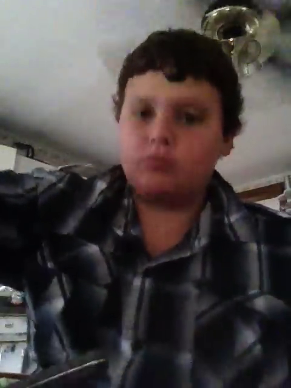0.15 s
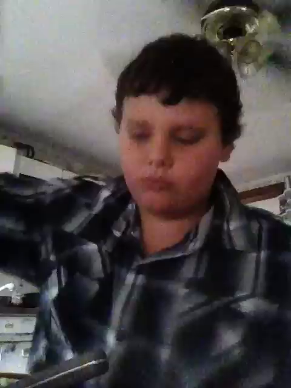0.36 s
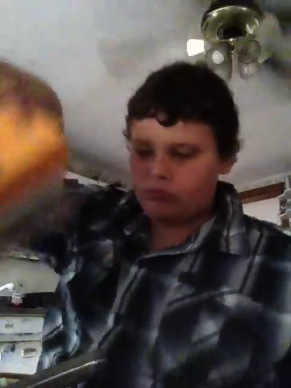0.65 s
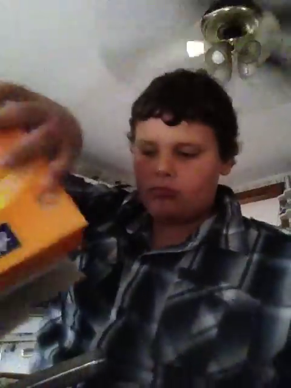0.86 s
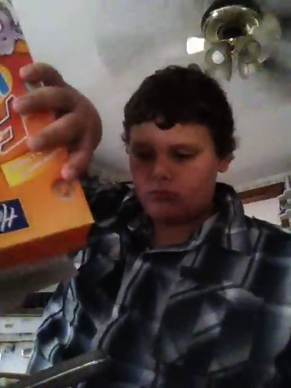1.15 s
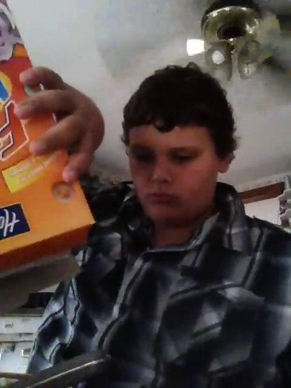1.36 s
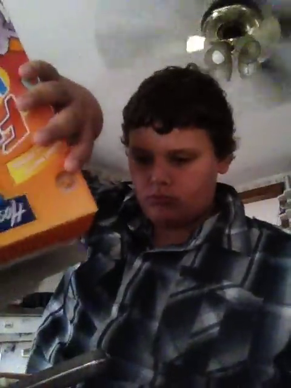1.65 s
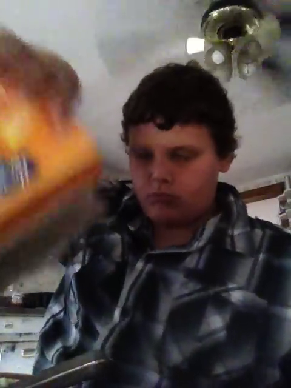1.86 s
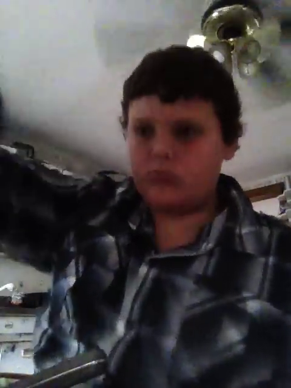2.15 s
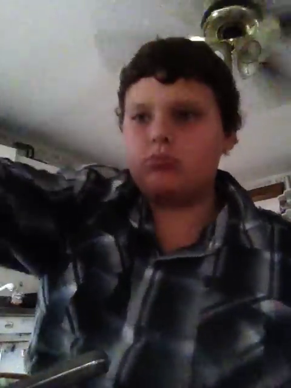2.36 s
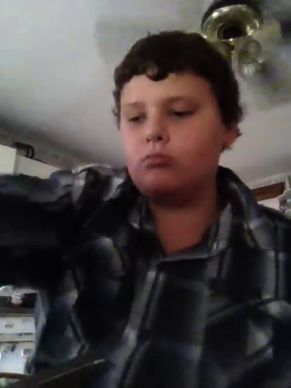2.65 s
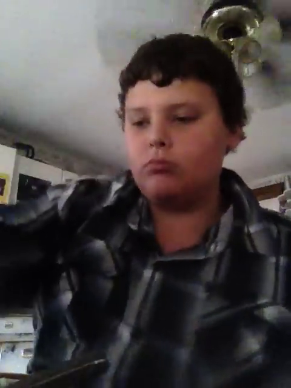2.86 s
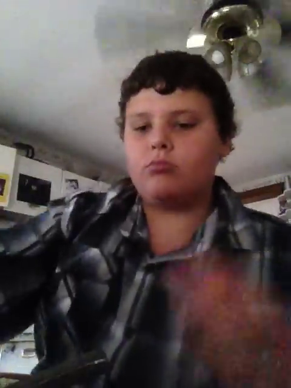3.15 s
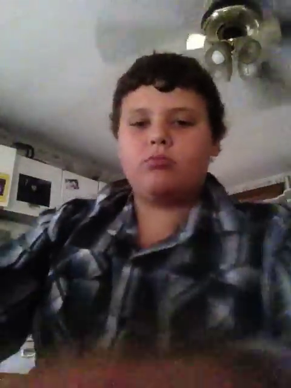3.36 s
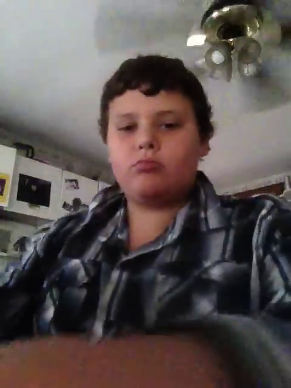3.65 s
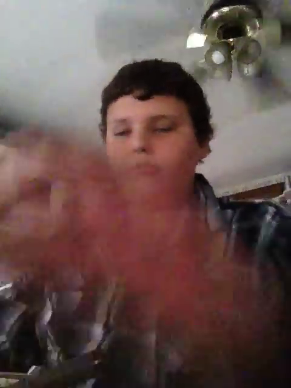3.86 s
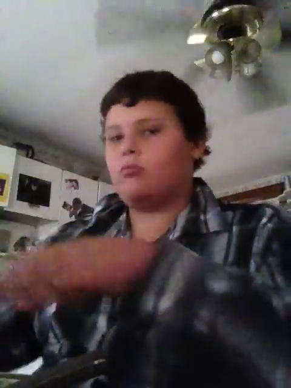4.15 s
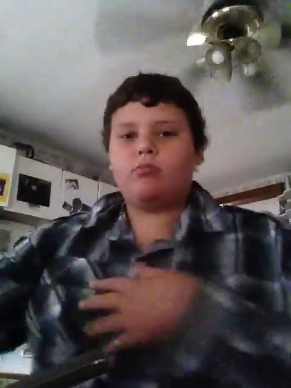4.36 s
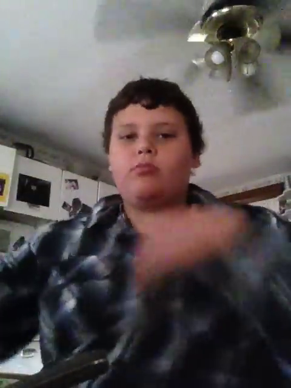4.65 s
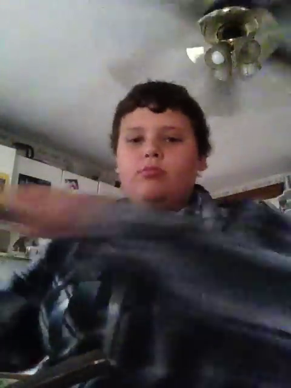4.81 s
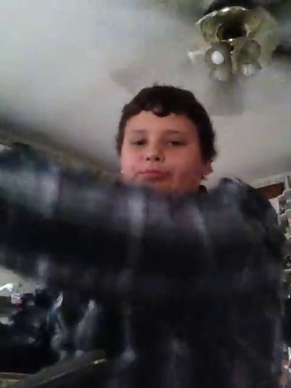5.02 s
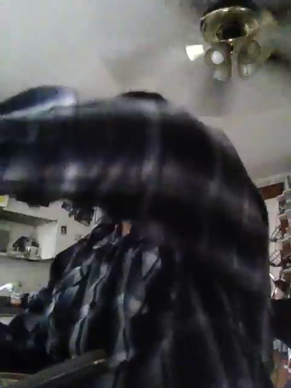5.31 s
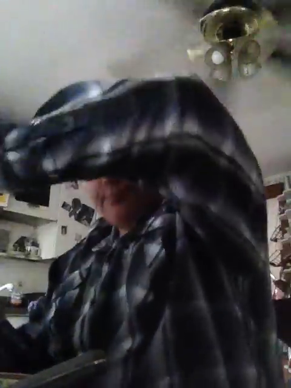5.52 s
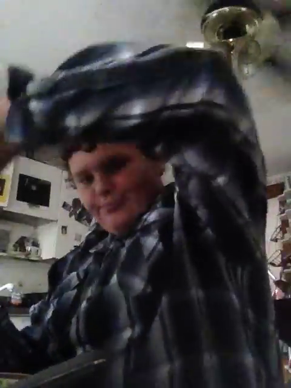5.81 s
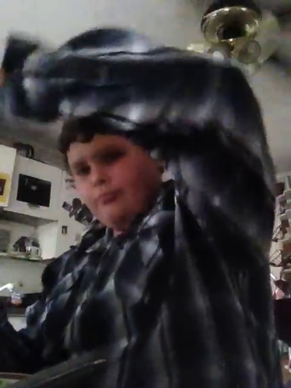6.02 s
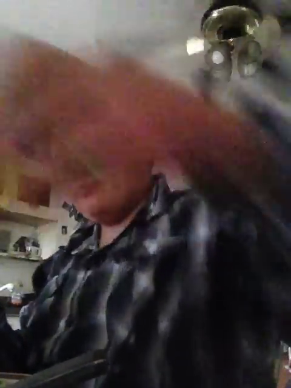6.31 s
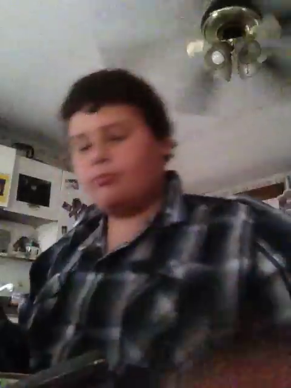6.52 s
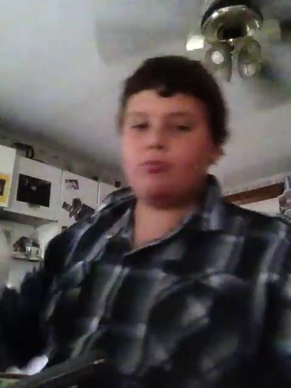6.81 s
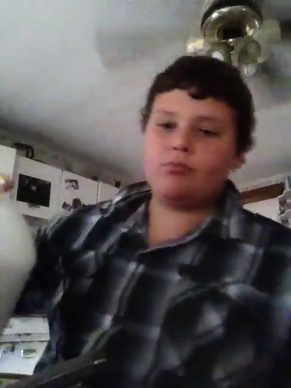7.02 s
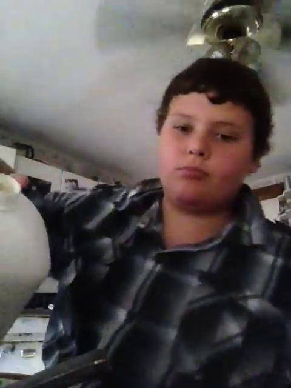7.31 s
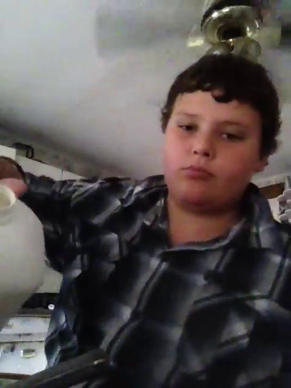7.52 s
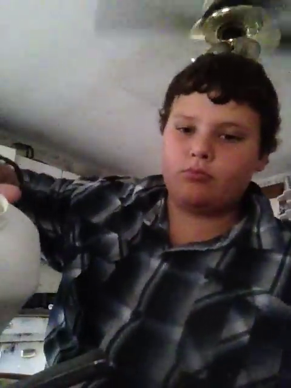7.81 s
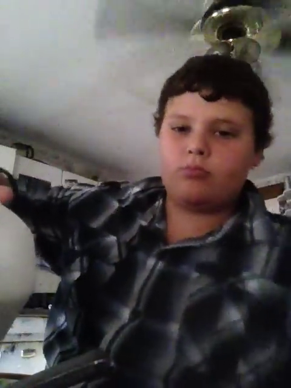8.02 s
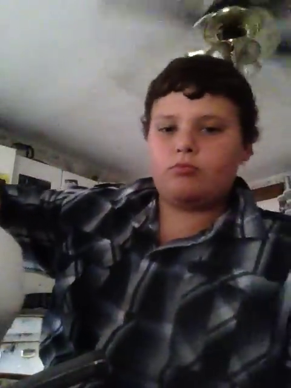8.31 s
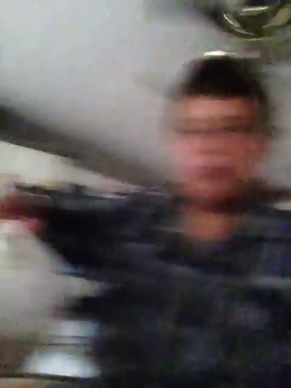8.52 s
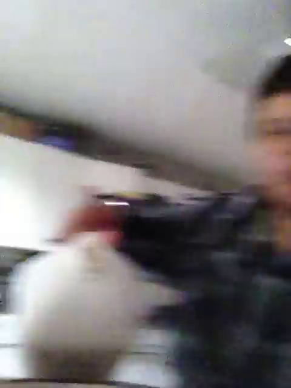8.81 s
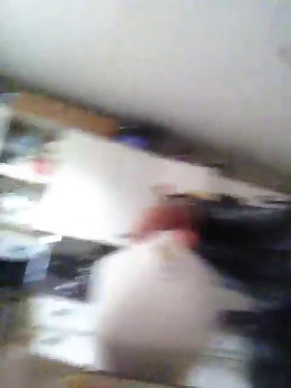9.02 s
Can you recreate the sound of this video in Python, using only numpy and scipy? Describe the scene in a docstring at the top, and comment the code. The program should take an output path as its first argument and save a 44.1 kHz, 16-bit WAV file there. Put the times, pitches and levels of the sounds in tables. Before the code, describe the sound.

A steady airy wash of ceiling fan and fridge, with faint low motor hum and slight hiss, runs throughout. From 0 to 0.6 s a carton rustles with dry ticks and a short sinking flap drag. At 0.7-1.2 s it grows into a dense, loud burst of hollow cardboard pops and knocks with gritty cereal rustle, trailing off with faint ceramic rings to 1.5 s. A lull follows until 2.3 s, then a hard bright clatter with dull table thuds peaks around 2.55 s. Rustling and small taps thin out to 3.7 s, ending with delicate bowl clinks. A small clink comes at 4.1 s, then knocks and soft sliding from 4.3 to 6.1 s. Sharp knocks and a scuff at 6.6-6.8 s fade away. At 8.24 s a plastic jug snaps sharply with a brief hollow ring; soft low bumps follow at 8.5 and 9 s.

```python
"""Cereal at a kitchen table

A carton rustles, knocks and pops as cereal is tipped into a ceramic bowl; a spoon clinks, things slide over
the table top and a plastic jug snaps open. A ceiling fan and a fridge fill the room.
Rubbing is random slips through resonances, knocks are noise bursts, the bowl is paired decaying sines,
the fan and fridge are filtered noise. A small microphone lies on the same table, close by."""
import sys
import numpy as np
from scipy import signal
from scipy.io import wavfile
from scipy.ndimage import uniform_filter1d

SR = 44100
rng = np.random.default_rng(int(sys.argv[2]) if len(sys.argv) > 2 else 0)


def waveform_to_disk(signal):
    """Save audio, clipped to [-1, 1], as 16-bit WAV at the path in sys.argv[1]."""
    frames = np.transpose(np.atleast_2d(signal))
    scaled = np.clip(frames, -1, 1) * 32767
    samples = np.round(scaled).astype(np.int16)
    wavfile.write(sys.argv[1], SR, samples)


N = 404387
TIME = np.arange(N) / SR

# air and panels of the carton: (centre [Hz], width of one pass [Hz], level [dB])
CARTON_MODES = [(563, 227, 4.5), (678, 94, 6.5), (771, 162, 6.5), (933, 263, 5.5), (1282, 205, -1.5),
                (2186, 420, -15.5)]
# table top: (centre [Hz], width of one pass [Hz], level [dB])
TABLE_MODES = [(146, 39, -3.5), (227.6, 75, 1.5), (371, 217, -1), (448, 164, 4)]
# spectrum of a scraped or struck surface: (frequency [Hz], density [dB per Hz])
SCRAPE_SPECTRUM = [(500, -24), (1000, -15), (1500, -9), (2500, -14.5), (4000, -14.5), (5000, -14.5),
                   (6500, -43)]
# spectrum of a bright crack: (frequency [Hz], density [dB per Hz])
CRACK_SPECTRUM = [(3000, -45), (4500, 3), (5500, 2.5), (7500, 8.5), (9500, -1), (12000, -19.5),
                  (16000, -12)]


def gain_of(db):
    """Amplitude factor of a level in dB."""
    return 10 ** (np.asarray(db) / 20)


def evened(x):
    """Scales to an rms of 1."""
    return x / np.sqrt(np.mean(x ** 2) + 1e-20)


def read(points, hz):
    """Reads a curve of (Hz, value), interpolated over log frequency."""
    f, value = np.transpose(points)
    return np.interp(np.log(hz + 1), np.log(f + 1), value)


def add(mix, start_s, sound):
    """Adds a sound to the mix in place, cut at the end."""
    part = mix[round(start_s * SR):][:len(sound)]
    part += sound[:len(part)]


def colour(x, points):
    """Causal filter with the given spectrum: the phase follows from the log gain."""
    log_gain = np.log(gain_of(read(points, abs(np.fft.fftfreq(4096, 1 / SR)))))
    minimum_phase = np.exp(np.conj(signal.hilbert(log_gain)))
    taps = np.fft.ifft(minimum_phase).real[:2048]
    return signal.oaconvolve(x, taps)[:len(x)]


def resonate(x, hz, width_hz):
    """Shifts the curve hz down to zero, smooths, and shifts back: a resonance of gain 1."""
    turn = np.exp(2j * np.pi * np.cumsum(hz * np.ones(len(x))) / SR)
    pole = np.exp(-np.pi * width_hz / SR)
    return 2 * (turn * signal.lfilter([1 - pole], [1, -pole], x / turn)).real


def body(x, modes):
    """Sum of broad resonances of alternating sign, each applied twice for steep skirts."""
    total = 0
    for k, (hz, width_hz, db) in enumerate(modes):
        mode = resonate(resonate(x, hz, width_hz), hz, width_hz)
        total = total + (-1) ** k * gain_of(db) * mode
    return total


def grit(per_s, spread_db):
    """Sparse slips of random sign; a few are much larger."""
    size_draw, sign_draw, slip_draw = rng.random((3, N))
    size = gain_of(-spread_db * np.log(np.maximum(size_draw, .01)))
    return evened(size * np.sign(sign_draw - .5) * (slip_draw < per_s / SR))


def air():
    """Fan and fridge: coloured noise that drifts slowly, with motor tones of narrow-band noise."""
    # rush of air: (frequency [Hz], density [dB per Hz])
    rush_spectrum = [(18, -65), (30, -47), (90, -19), (145, 0), (221, -6.5), (252, -0.5), (384, -1),
                     (426, -2.5), (461, -4), (649, -5), (988, -6), (2300, -9), (4780, -22), (5450, -21),
                     (14400, -32.5), (16000, -44)]
    # drift of the rush: (time [s], level [dB])
    rush_swell = [(0, 1), (2, -1), (4, 0), (6.4, -0.5), (7.6, 1.6), (8.3, 1.6), (9.17, 0.6)]
    # wavering motor tones: (centre [Hz], width [Hz], level [dB rms])
    motor_tones = [(133, 52, -76), (219.5, 4.5, -67), (475, 4.5, -68.5)]
    rush_db = -61
    swell = gain_of(np.interp(TIME, *np.transpose(rush_swell)))
    mix = gain_of(rush_db) * evened(colour(rng.standard_normal(N), rush_spectrum)) * swell
    for hz, width_hz, db in motor_tones:
        mix = mix + gain_of(db) * evened(resonate(rng.standard_normal(N), hz, width_hz))
    return mix


def rubbing(swells, gritty, clumpy_db):
    """One stream of slips drives the scraped surface, the table top, a hollow body and a fine fizz."""
    # (smooth slips [per s], sharp snaps [per s])
    smooth_per_s, snaps_per_s = 2600, 310
    # fine fizz: (frequency [Hz], density [dB per Hz])
    fizz_spectrum = [(3500, -29), (5200, -1), (7500, 5.5), (10000, -2.5), (13000, -5), (16000, -9)]
    fade_db = -20  # over one rise or fall time
    s, rise, hold, fall, db, thrum_db, hollow_db, fizz_db, swell_hz = np.transpose(swells)[:, :, None]

    t = TIME[::64]
    before = np.maximum(s - t, 0) / np.maximum(rise, .003)
    after = np.maximum(t - s - hold, 0) / np.maximum(fall, .003)
    power = gain_of(np.maximum(db + fade_db * (before + after), -120)) ** 2
    hz = np.interp(TIME, t, (power * swell_hz).sum(0) / power.sum(0))
    levels = [np.interp(TIME, t, np.sqrt((power * gain_of(d) ** 2).sum(0)))
              for d in (0, thrum_db, hollow_db, fizz_db)]

    # slips come in bunches, partly shared by the four parts
    bunches = evened(uniform_filter1d(uniform_filter1d(rng.standard_normal((5, N)), size=400), size=200))
    clumps = gain_of(clumpy_db * (0.36 * bunches[0] + 0.68 * bunches[1:]))
    force, thrum, hollow, fizz = clumps * levels

    slips = rng.standard_normal(N) + gritty * (grit(smooth_per_s, 3.0) + .8 * grit(snaps_per_s, 3.2))
    scrape = colour(slips, SCRAPE_SPECTRUM)
    scrape = evened(0.036 * evened(scrape) + evened(resonate(scrape, hz, 1940)))
    return (force * scrape
            + thrum * evened(body(slips, TABLE_MODES))
            + hollow * evened(body(slips, CARTON_MODES))
            + fizz * evened(colour(slips, fizz_spectrum)))


def bump(db, hz, t60_s):
    """A soft push, about a cycle long, swings a panel that then dies away."""
    rise_cycles = 0.58  # time constant
    t = np.arange(SR // 4) / SR
    onset = (1 - np.exp(-t * hz / rise_cycles)) ** 2
    swing = np.sin(2 * np.pi * hz * t) * gain_of(-60 * t / max(t60_s, .01)) * onset
    return gain_of(db) * swing / abs(swing).max()


def knock(db, hollow_db, crack_db, rattle_ms):
    """A blow and its short rattle: the struck spot, the table under it, a hollow body and a bright crack."""
    thud_db = -24.5  # table, re struck spot
    middle_spot_hz, hollow_db_per_octave = 1820, 44  # hollower knocks sound lower
    hollow_lead_s = 0.00195  # drops the slow start of the doubled resonances: the hollow answers at once
    t = np.arange(SR // 5) / SR
    spot_hz = middle_spot_hz * 2 ** (-hollow_db / hollow_db_per_octave)

    blow = gain_of(-60 * (1000 * t / max(rattle_ms, 3)) ** 1.7) + 2.3 * gain_of(-14000 * t)
    contact = rng.standard_normal(len(t)) * blow * np.minimum(t / 0.00033, 1)
    contact[6] += 5.0  # the first touch is one clean tick

    spot = evened(resonate(contact, spot_hz, 0.53 * spot_hz)) + 1.14 * evened(contact)
    spot = colour(spot, SCRAPE_SPECTRUM)
    thud = body(contact, TABLE_MODES)
    crack = colour(contact * gain_of(-900 * t), CRACK_SPECTRUM)  # crack dies first
    hollow = np.roll(body(contact, CARTON_MODES), -round(hollow_lead_s * SR))
    hollow = signal.lfilter(*signal.butter(2, 250, "high", fs=SR), hollow)  # too small for bass
    parts = [(0, spot), (thud_db, thud), (hollow_db, hollow), (crack_db, crack)]
    return sum(gain_of(db + part_db) * x / abs(x).max() for part_db, x in parts)


def flap():
    """A carton flap drags: gritty slips through one resonance that mostly sinks."""
    # (time [s], resonance [Hz], level [dB])
    drag_path = [(.41, 1880, -53), (.432, 1750, -48), (.47, 1750, -51), (.5, 1470, -50.5), (.54, 1250, -57),
                 (.6, 1310, -58), (.63, 1200, -68)]
    s, hz, db = np.transpose(drag_path)
    slips = rng.standard_normal(N) + 1.2 * grit(1800, 2.5)
    drag = evened(resonate(slips, np.interp(TIME, s, hz), 280))
    return gain_of(np.interp(TIME, s, db, left=-120, right=-120)) * drag


def pop(db, hz, length_s):
    """A carton panel flips, holds its note with a slight waver and is damped by the hand."""
    t = np.arange(SR // 8) / SR
    waver = 1 + 0.031 * evened(uniform_filter1d(rng.standard_normal(len(t)), size=300))
    note = np.sin(2 * np.pi * np.cumsum(hz * waver) / SR)
    damping = gain_of(-41 * (t / max(length_s, .005)) ** 3)
    return gain_of(db) * damping * np.minimum(t * hz, 1) * note


def clink(db, others_db, place, damping):
    """The bowl rings as decaying modes; the place on the rim shares each blow between twin modes."""
    # modes split in two by the uneven rim, the first leads:
    # (mode [Hz], twin [Hz], level [dB], t60 before damping [s])
    bowl_modes = [(3785, 3590, 0, .22), (2025, 2200, 3, .11), (5430, 5520, -7, .3), (5770, 6820, -11, .14),
                  (7960, 7990, -8, .26), (8900, 8780, -14, .13), (10430, 10380, -10, .11),
                  (11750, 11330, -15, .11), (13340, 12670, -13, .11)]
    hz, twin_hz, mode_db, t60_s = np.transpose(bowl_modes)
    t = np.arange(SR // 3)[:, None] / SR
    phase, twin_phase = rng.random((2, len(bowl_modes)))  # cycles

    turn = np.pi / 2 * place
    pair = np.cos(turn) * np.sin(2 * np.pi * (hz * t + phase))
    pair = pair + np.sin(turn) * np.sin(2 * np.pi * (twin_hz * t + twin_phase))

    # each mode wavers at random, which roughens the ring
    wander = uniform_filter1d(rng.standard_normal(pair.shape), size=260, axis=0)
    waver = .9 + .4 * evened(uniform_filter1d(wander, size=130, axis=0))

    weight_db = mode_db + others_db * (np.arange(len(bowl_modes)) > 0)
    ring = gain_of(db + weight_db - 60 * t / (damping * t60_s)) * pair * waver
    t = t[:, 0]
    return ring.sum(1) * np.minimum(t / 0.001, 1) * (1 + .5 * gain_of(-1500 * t))  # loudest under the blow


def cap(db):
    """A snap of a few milliseconds passes the damped plastic jug, which shudders and rings on faintly."""
    # body of the jug: (centre [Hz], width of one pass [Hz], level [dB])
    jug_modes = [(342, 120, -2.5), (547, 150, 4), (765, 160, 10.5), (1010, 150, 10), (1435, 160, 18),
                 (1520, 120, 13), (1770, 530, 9), (2280, 310, 4.5), (2490, 460, 6), (3100, 380, 4.5),
                 (3660, 530, -3), (6230, 680, -6)]
    # ringing modes: (frequency [Hz], level re burst peak [dB], t60 [s])
    jug_ring = [(1362, -20, .15), (1490, -25, .33), (3015, -24, .08)]
    t = np.arange(SR // 4) / SR
    snap, shudder = rng.standard_normal((2, len(t)))
    snap = snap * gain_of(-7000 * t)
    shudder = shudder * 0.19 * gain_of(-320 * t)
    snap[0] = 6
    burst = body(snap, jug_modes) + body(shudder, jug_modes[:-1]) + 0.034 * colour(snap, CRACK_SPECTRUM)
    ring = sum(gain_of(ring_db - 60 * t / t60_s) * np.sin(2 * np.pi * hz * t)
               for hz, ring_db, t60_s in jug_ring)
    return gain_of(db) * (burst / abs(burst).max() + ring)


def kitchen(x):
    """Room echoes: sparse taps of random sign, each band dying at its own speed."""
    # (frequency [Hz], t60 [s])
    decay = [(200, 0.38), (530, 0.084), (1400, 0.31), (3700, 0.2), (9700, 0.27)]
    taps = np.zeros(SR // 2)
    at = np.arange(200, len(taps) - 20, 20)
    taps[at + rng.integers(0, 20, len(at))] = rng.choice([-1., 1.], len(at))
    hz, t, bands = signal.stft(taps, SR, nperseg=256)
    bands = bands * gain_of(-60 * t / read(decay, hz)[:, None])
    tail = signal.istft(bands, SR, nperseg=256)[1]
    return signal.fftconvolve(x, tail / np.linalg.norm(tail))[:N]


def scene():
    """Sums the near sounds, their room echoes and the air of the room."""
    # overlapping swells of cereal and carton rustling; thrum, hollow and fizz re scrape:
    # (full force [s], rise [s], hold [s], fall [s], scrape [dB], table thrum [dB], hollow carton [dB],
    # fizz [dB], scrape centre [Hz])
    rustle_swells = [(0.06, 0.15, 0.0054, 0.23, -44, -1, -6.5, -6.5, 2470),
                     (0.19, 0.23, 0.02, 0.084, -45.5, -11, -21, -18, 1690),
                     (0.42, 0.042, 0.045, 0.11, -50.5, -21, -2, -13, 1700),
                     (0.53, 0.16, 0.06, 0.11, -57, 2, 8.5, -32, 1500),
                     (0.778, 0.097, 0.2, 0.064, -43.5, -1, 0, -14.5, 1260),
                     (1.062, 0.037, 0.0036, 0.32, -34, -2.5, -18, -23, 2000),
                     (1.29, 0.057, 0.0071, 0.087, -53, -18, -0.5, -12, 2160),
                     (1.344, 0.12, 0.097, 0.11, -48.5, -7, -8, -5.5, 2060),
                     (1.55, 0.18, 0.029, 0.23, -58, -29, -9, -12, 2050),
                     (1.85, 0.42, 0.014, 0.11, -61.5, -12, -18, -11, 2160),
                     (1.97, 0.047, 0.061, 0.11, -56.5, -14, -10, -9.5, 2460),
                     (2.311, 0.019, 0.015, 0.063, -38.5, 2.5, -6.5, -5, 2230),
                     (2.38, 0.076, 0.14, 0.11, -55.5, -3, -13, -5.5, 2160),
                     (2.532, 0.024, 0.032, 0.075, -27, -3.5, -15, -6, 2850),
                     (2.6, 0.051, 0.049, 0.26, -35, -6.5, -8.5, -5.5, 3200),
                     (2.9, 0.63, 0.35, 0.21, -52.5, -1.5, -7, -8, 2870),
                     (3.5, 0.16, 0.045, 0.12, -61, 2, -24, -16, 2300),
                     (3.6, 0.077, 0.12, 0.11, -56.5, -3, -6, -1, 2980)]
    # overlapping swells of sleeve and jug sliding over the table, several can make one slide;
    # thrum, hollow and fizz re scrape:
    # (full force [s], rise [s], hold [s], fall [s], scrape [dB], table thrum [dB], hollow body [dB],
    # fizz [dB], scrape centre [Hz])
    slide_swells = [(4.27, 0.013, 0.0073, 0.079, -46.5, -3.5, -1, -10, 1880),
                    (4.364, 0.099, 0.0053, 0.082, -44.5, -15, -7.5, -14.5, 3070),
                    (4.52, 0.024, 0.006, 0.27, -40.5, -4, -3.5, -10, 2440),
                    (4.702, 0.025, 0.012, 0.11, -45, -1.5, 1.5, -19, 1890),
                    (4.78, 0.35, 0.28, 0.5, -40, -38, -14.5, -6, 3200),
                    (5.1, 0.41, 0.11, 0.52, -53, -1, 4.5, -15, 1500),
                    (5.3, 0.93, 0.081, 0.044, -49, -22.5, -7, -5.5, 2330),
                    (5.56, 0.45, 0.12, 0.16, -54, -4, 0.5, -9, 2220),
                    (5.67, 0.11, 0.043, 0.13, -53, -30, -26, -8.5, 2920),
                    (5.888, 0.11, 0.0037, 0.13, -49.5, -1, 2, -13.5, 2100),
                    (6.072, 0.018, 0.017, 0.12, -45.5, -8, -4.5, -16.5, 1250),
                    (6.643, 0.031, 0.0044, 0.031, -38.5, -18, -25, -30, 1760),
                    (6.69, 0.13, .01, 0.67, -49.5, -6, -4, -13, 2020),
                    (6.762, 0.045, 0.011, 0.088, -45, -12, -15, -2.5, 2000),
                    (7.23, 0.21, .01, 0.36, -59, -11, -24, -3, 2320)]
    # dull bumps carried by the table: (time [s], peak [dB], frequency [Hz], t60 [s])
    bump_events = [(0.018, -38.5, 188, 0.035), (0.871, -62, 233, 0.061), (2.31, -38.5, 195, 0.25),
                   (2.556, -28, 150, 0.09), (2.574, -21.5, 227, 0.026), (0.787, -33.5, 334, 0.05),
                   (4.535, -44, 145, 0.52), (3.163, -35, 215, 0.016), (2.545, -29, 503, 0.039),
                   (2.745, -32.5, 550, 0.02), (2.852, -31, 536, 0.026), (3.203, -37.5, 447, 0.023),
                   (3.329, -44.5, 414, 0.04), (2.947, -47, 145, 0.3), (3.019, -48, 151, 0.058),
                   (3.19, -47, 213.5, 0.026), (4.512, -33, 244, 0.06), (4.98, -39.5, 827, 0.082),
                   (5.075, -35.5, 1070, 0.035), (5.645, -41, 837, 0.1), (6.68, -49, 298, 0.4),
                   (8.512, -41.5, 155, 0.08), (8.541, -43, 205, 0.022), (8.938, -43, 173, 0.047),
                   (9.04, -52, 184, 0.042), (9.106, -47, 178, 0.03)]
    # knocks and ticks; hollow and crack re spot:
    # (time [s], struck spot peak [dB], hollow [dB], crack [dB], rattle t60 [ms])
    knock_events = [(0.0224, -31.5, -7.5, 0.5, 26), (0.0531, -29, -22, 3, 20), (0.154, -26, -15, -12, 24),
                    (0.177, -28, -24, -12, 8.6), (0.196, -36.5, -17, 4, 17), (0.225, -30, -13, -6, 17),
                    (0.403, -23.5, -22, -8, 17), (0.409, -37, -29, -6, 24), (0.49, -37, -3, -22, 14),
                    (0.5425, -42, 8, -25, 24), (0.561, -57, 1, -27, 16), (0.5699, -37, 1, -22, 33),
                    (0.6805, -58, 16, -25, 22), (0.7045, -48, 16, -10, 15), (0.7155, -46, 13, -25, 72),
                    (0.7725, -44, 17, -20, 14), (0.781, -44, 17, -22, 26), (0.7888, -19.5, 1.5, -11.5, 33),
                    (0.818, -40, 9, -17, 22), (0.849, -41, 14, 1, 40), (0.86, -40, 17, -20, 26),
                    (0.8835, -32.5, 12, -21, 40), (0.896, -29, -3, -14, 16), (0.922, -29, 2, -10.5, 63),
                    (0.934, -28.5, 7.5, -8, 32), (1.0091, -21, 7, -22, 22), (1.017, -20, 2, -16, 30),
                    (1.0504, -16, -11, -3, 26), (1.061, -25, 3, -19, 13), (1.068, -21, 10, -20, 18),
                    (1.0806, -18, 2, -4, 58), (1.0912, -17.5, -22, -5, 36), (1.1249, -17.5, -5.5, -24, 33),
                    (1.138, -25.5, 6, -5, 39), (1.1597, -24, 0, -1.5, 75), (1.213, -44, -1.5, -2, 37),
                    (1.255, -52.5, -7, -6, 23), (1.267, -34, -9, 0.5, 20), (1.283, -33, -8, -13, 20),
                    (1.329, -28, -28, -6, 24), (1.3371, -26, -2, -19, 21), (1.3789, -23, -8.5, -5, 29),
                    (1.503, -45, 1.5, 6, 29), (1.5201, -32.5, -20, -7, 23), (2.29, -32, -20, -2, 24),
                    (2.325, -31, -6, 6, 12), (2.451, -27.5, -18, 1, 7.8), (2.457, -31.5, -18, -2, 10),
                    (2.483, -22.5, -20, -4.5, 49), (2.504, -24, -20, -14, 12), (2.51, -26, -25, -8, 9),
                    (2.5241, -29, -20, -1, 13), (2.5306, -13, -18, -7, 20), (2.535, -27, -23, -6, 12),
                    (2.543, -11.5, -35, -4, 18), (2.55, -24, -26, 1, 8.2), (2.557, -17.5, 2.5, -18, 14),
                    (2.573, -24.5, -15, 7, 11), (2.5913, -23, -12, -14, 8.7), (2.601, -15, -22, -4, 13),
                    (2.736, -26, -23, -13, 12), (2.744, -33, -22, -2, 29), (2.782, -37.5, -23, -5, 15),
                    (2.793, -36, -29, -1, 20), (2.8519, -29, -8, -9, 39), (2.885, -35, 1, -7, 26),
                    (2.894, -33, -22, 2, 23), (3.0133, -40, -32, -15, 10), (3.02, -32.5, -51, -24, 14),
                    (3.132, -39, -10, -1, 18), (3.2029, -32.5, -10, -7, 20), (3.211, -36, -25, 0, 16),
                    (3.2847, -34.5, -10, -22, 11), (3.293, -34.5, -24, -18, 19),
                    (3.3242, -38.5, -14, -31, 62), (3.436, -39, -53, 2.5, 16), (3.526, -48, -24, 0, 19),
                    (3.567, -32.5, -3, 2, 11), (3.5797, -29, -4.5, -20, 22), (3.6658, -32, -12, -1, 11),
                    (3.6711, -35, -17, -7, 11), (4.112, -29, -10.5, 4, 4.3), (4.264, -30.5, -22, -11, 47),
                    (4.2832, -50, 2, -20, 32), (4.383, -42.5, -32, 4, 9), (4.343, -35, -32, -12, 22),
                    (4.509, -30.5, 6, -11, 16), (4.6908, -31, -0.5, -12, 15), (5.6793, -38, -49, -4, 14),
                    (5.882, -31.5, -7, -17, 18), (6.0656, -35.5, 2, -13, 22),
                    (6.6132, -23.5, -13.5, 2.5, 13), (6.623, -43, -22, -10, 9), (6.6411, -26, -12, -30, 18),
                    (6.7095, -47, -25, 14, 13), (6.714, -32, -36, 2, 15), (6.7482, -30, -40, -8, 20),
                    (6.755, -44, -11, -25, 18), (6.911, -57.5, 14.5, -32, 49), (8.543, -46, -2, -30, 15)]
    # carton panels popping: (time [s], level [dB], note [Hz], time to fall 41 dB [s])
    pop_events = [(0.714, -41.5, 834, 0.049), (.779, -29, 1240, 0.083), (.781, -46, 2150, .05),
                  (0.789, -17, 906, 0.016), (0.818, -35, 860, 0.027), (0.861, -32, 870, 0.035),
                  (0.883, -30, 803, 0.02), (.921, -34.5, 2170, 0.033), (0.935, -24.5, 950, 0.013),
                  (0.939, -30.5, 1242, 0.043), (1.009, -12.5, 888, 0.028), (1.011, -18.5, 591, 0.046),
                  (1.055, -20, 835, 0.023), (1.068, -10.5, 880, 0.014), (1.077, -22, 955, 0.029),
                  (1.091, -21, 606, 0.021), (1.125, -19, 871, 0.02), (1.136, -23.5, 946, 0.021),
                  (1.156, -24, 954, 0.02), (1.197, -42, 940, 0.025), (1.217, -38, 750, 0.031),
                  (1.258, -29, 700, 0.022), (1.281, -35.5, 2030, 0.016), (1.336, -36, 1660, .012),
                  (1.339, -29.5, 730, 0.023), (2.552, -24.5, 1356, .014), (2.707, -40, 730, 0.022),
                  (4.283, -37.5, 865, 0.023), (4.511, -37, 464, 0.038), (6.069, -39, 1040, 0.049),
                  (6.752, -39.5, 1420, 0.018)]
    # cereal and spoon on the bowl: (time [s], level [dB], extra level of all modes but the first [dB],
    # place on the rim [0-1], damping [factor on t60])
    clink_events = [(.983, -43, -14, 0, .45), (1.267, -43, -16, 0, 1.4), (1.288, -39, -18, 0, 1.1),
                    (1.33, -52, -14, 0, 1.5), (1.378, -50, -14, 0, 1.2), (1.475, -54, -14, 0, 2),
                    (1.52, -57, -14, 0, 1), (3.435, -55, -8, .4, .35), (3.579, -51, -3, .2, 1.6),
                    (3.666, -44, 1, .12, .5), (3.681, -43, -7, .05, 1.2), (4.1118, -47, 0, .68, .75)]
    # cap of the jug snapping off: (time [s], burst peak [dB])
    cap_events = [(8.237, -21)]
    # filter that cancels one band of near sounds, the table echo: (frequency [Hz], gain [dB])
    table_echo = [(4600, -1.5), (4900, -3), (5150, -13), (5500, -1), (7000, -2.5)]

    hits, rings, bumps = np.zeros((3, N))
    for mix, events, sound in ((bumps, bump_events, bump), (hits, knock_events, knock),
                               (hits, pop_events, pop), (rings, clink_events, clink),
                               (hits, cap_events, cap)):
        for start_s, *settings in events:
            add(mix, start_s, sound(*settings))
    rub = rubbing(rustle_swells, 0.53, 2.46) + rubbing(slide_swells, 0.24, 1.3) + flap()

    near = hits + rings + bumps + rub
    to_room = gain_of(-5.5) * hits + gain_of(-7.5) * rings + gain_of(-9) * bumps + gain_of(-14.5) * rub
    near = near + kitchen(to_room)
    return (colour(near, table_echo) + air())[None]


def record(dry):
    """The loudest peaks round off; small microphone with weak bass and its own hiss; then the band limit."""
    # response: (frequency [Hz], gain [dB])
    microphone = [(20, -12), (40, -19), (80, -9.5), (130, -0.5)]
    # (frequency [Hz], density [dB per Hz])
    hiss_spectrum = [(7000, -10), (11000, -42), (13500, 13), (15400, 12)]
    ceiling, hiss_db_rms, edge_hz = .36, -76, 15450  # hiss level ahead of the band limit
    heard = colour(ceiling * np.tanh(dry[0] / ceiling), microphone)
    heard = heard + gain_of(hiss_db_rms) * evened(colour(rng.standard_normal(N), hiss_spectrum))
    lowpass = signal.firwin(511, edge_hz, window=("kaiser", 9), fs=SR)
    return signal.oaconvolve(heard[None], lowpass[None], "same")


dry = scene()
out = record(dry)
waveform_to_disk(out)
```